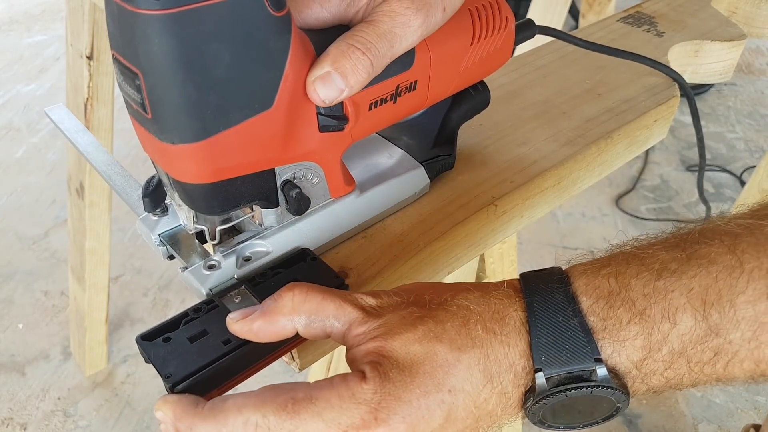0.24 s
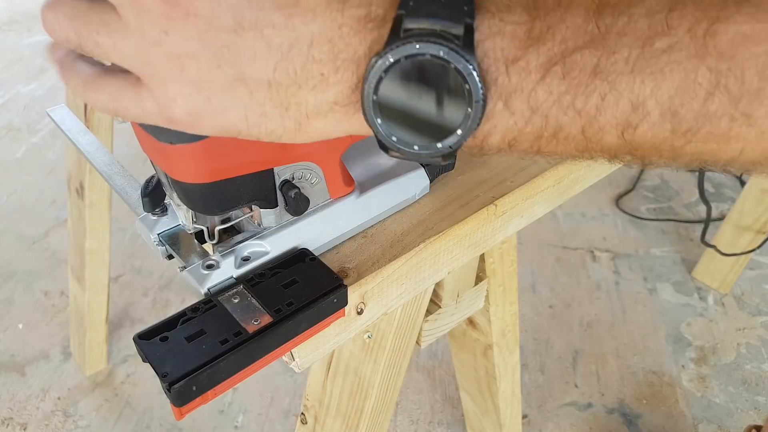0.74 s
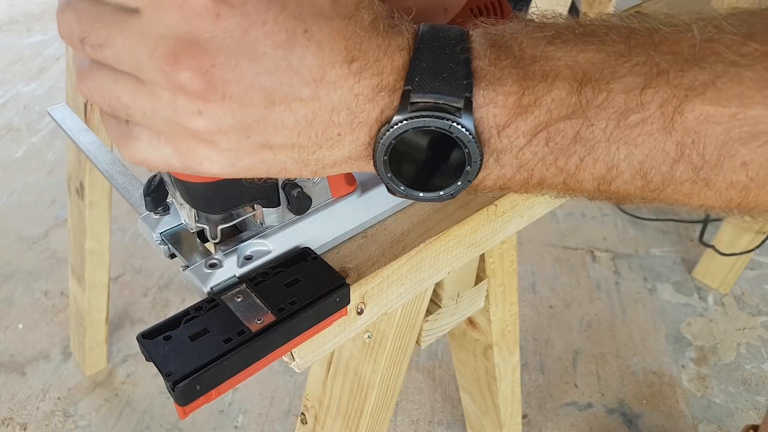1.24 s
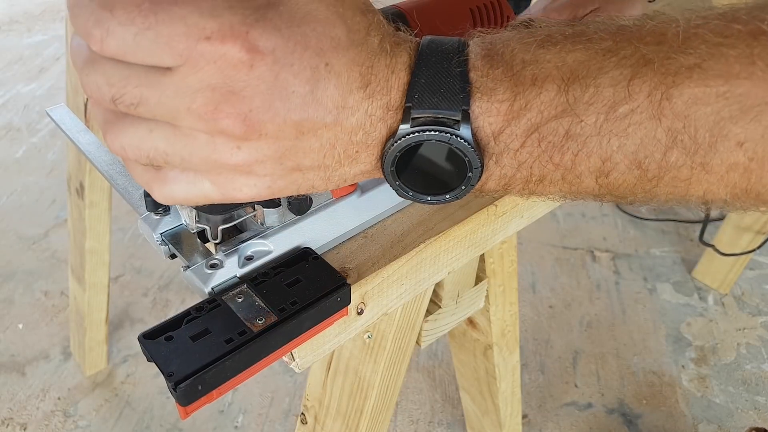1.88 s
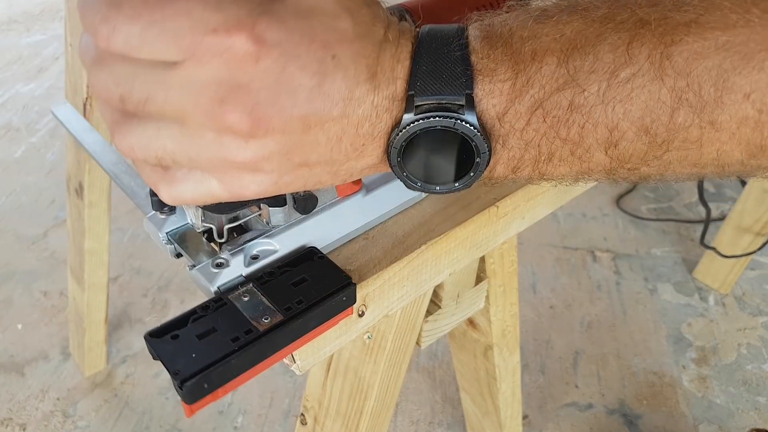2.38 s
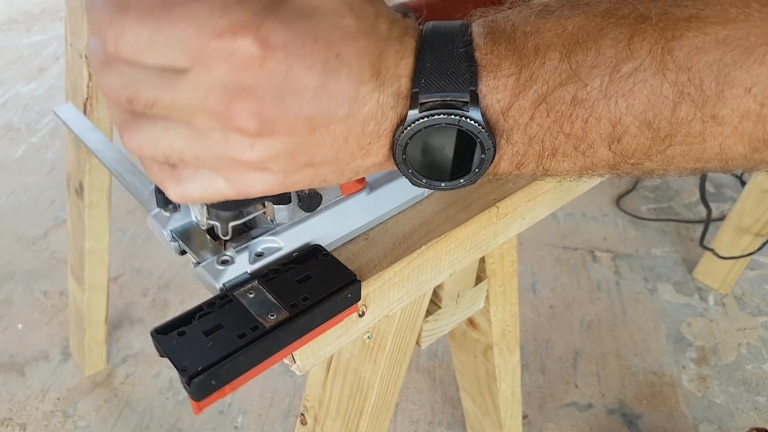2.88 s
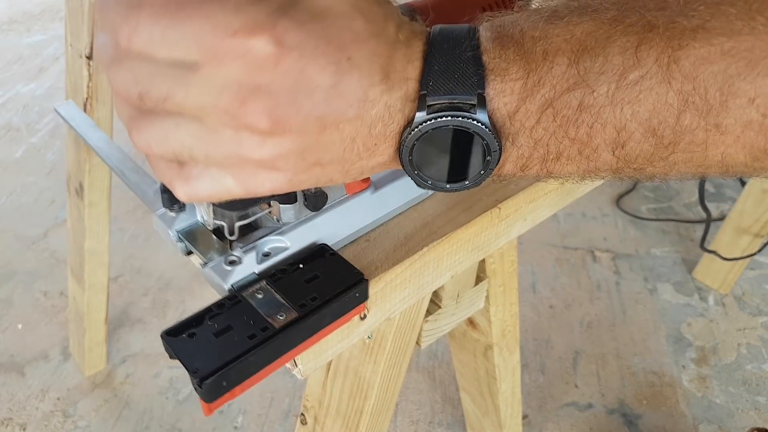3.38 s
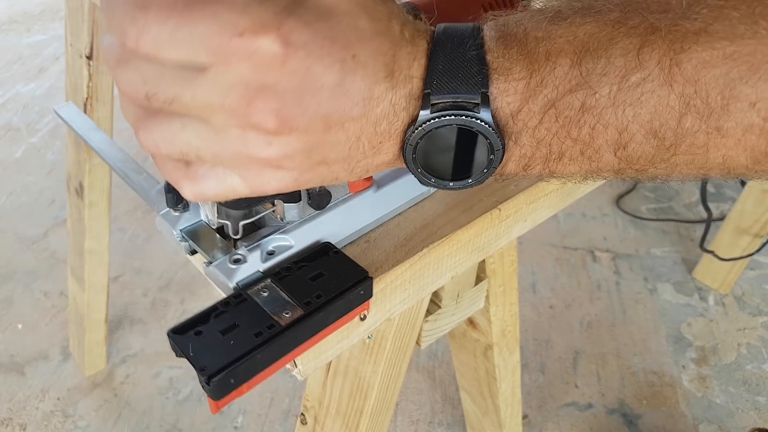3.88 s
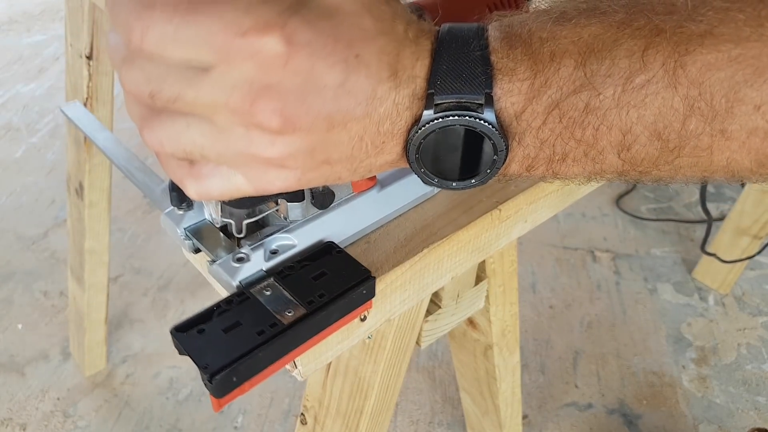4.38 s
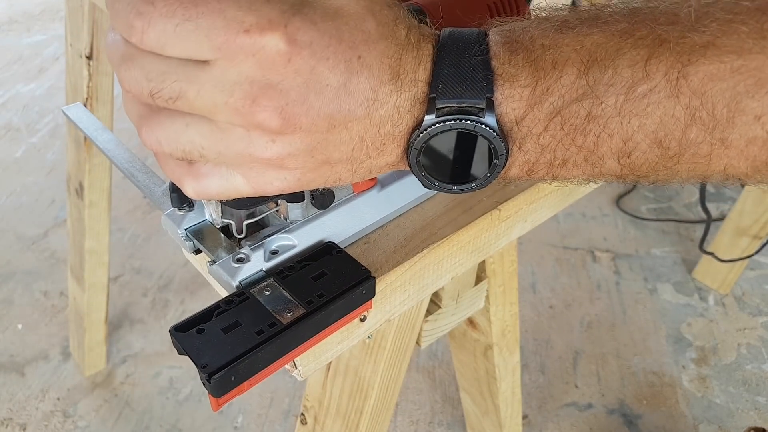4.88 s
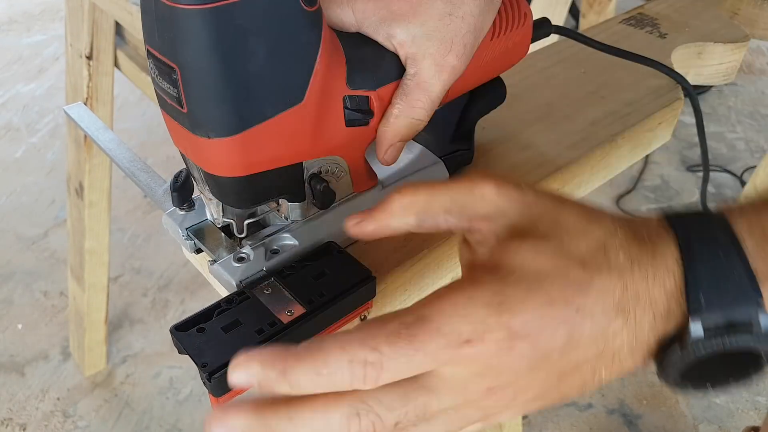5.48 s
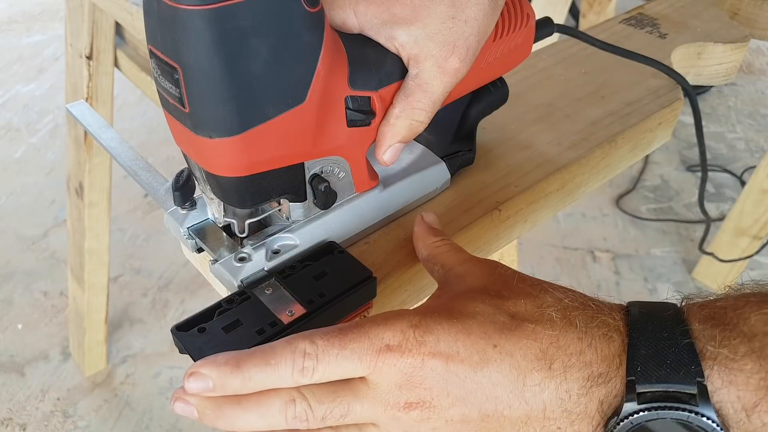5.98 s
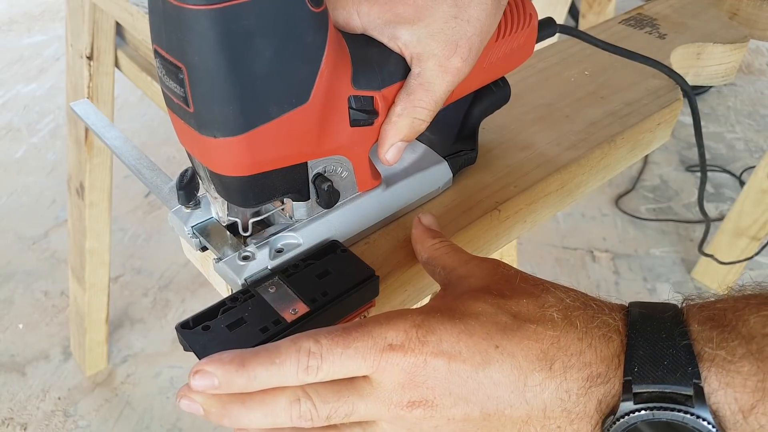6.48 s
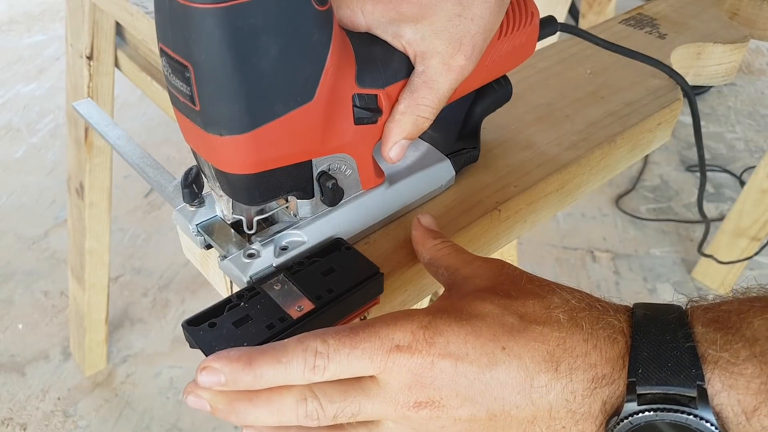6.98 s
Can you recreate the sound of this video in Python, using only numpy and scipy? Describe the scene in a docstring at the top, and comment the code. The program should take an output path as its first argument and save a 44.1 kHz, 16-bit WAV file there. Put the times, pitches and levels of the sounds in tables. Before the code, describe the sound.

Close to the microphone in a small shed, an electric jigsaw buzzes and rattles through wood without a break. The foot plate chatters against the board in spells, and the timber booms as the blade bites harder. Teeth and motor hiss in step with the strokes over a low hum from the sawhorse. The pitch dips a little, rises for a moment later on, and returns.

```python
"""A hard, rattling buzz: a corded jigsaw cuts a timber board on a sawhorse, in a shed, close to a camera.
Each stroke, about 48 a second, repeats nearly the same five knocks. They ring the saw's shell, foot plate
and the board; each part rings louder or softer as the hands press. Motor fan, gears and teeth hiss in
step with the stroke, with a faint whistle on top. Underneath, board and sawhorse hum and rumble."""
import sys
import numpy as np
from scipy import signal
from scipy.fft import rfft, irfft, next_fast_len
from scipy.io import wavfile
from scipy.ndimage import map_coordinates

SR = 44100
rng = np.random.default_rng(int(sys.argv[2]) if len(sys.argv) > 2 else 0)


def bounce(signal):
    """Save signal as a 16-bit WAV file at the path given by the first command-line argument."""
    frames = np.transpose(np.atleast_2d(signal))
    limited = np.clip(frames, -1, 1)
    pcm = np.round(limited * 32767).astype(np.int16)
    wavfile.write(sys.argv[1], SR, pcm)


N = 319284
TIME_S = np.arange(N) / SR
LEFT_RIGHT = np.array([[1], [-1]])


def amp(db):
    """dB to gain."""
    return 10 ** (np.asarray(db) / 20)


def unit(x):
    """x at rms 1."""
    return x / np.sqrt(np.mean(x ** 2) + 1e-20)


def unit_stereo(x):
    """x with its mono mix at rms 1."""
    return x / np.sqrt(np.mean(x.mean(0) ** 2))


def along(points, hz):
    """(Hz, value) points read on a log axis."""
    f, values = np.transpose(points)
    return np.interp(np.log(hz + 1), np.log(f + 1), values)


def curve(points):
    """(s, value) points read at every sample."""
    return np.interp(TIME_S, *np.transpose(points))


def wobble(rate_hz):
    """Smooth random curve, rate_hz knots a second."""
    return map_coordinates(rng.standard_normal(int(N * rate_hz / SR) + 4), [TIME_S * rate_hz])


def filtered(x, response):
    """x through a complex frequency response."""
    size = next_fast_len(N + 8192)
    return irfft(rfft(x, size) * response(np.fft.rfftfreq(size, 1 / SR)), size)[..., :N]


def sides(pan_db):
    """Left and right gains for a level difference."""
    return amp(LEFT_RIGHT * pan_db / 2)


def resonance(f, hz, width_hz):
    """Resonator applied twice for steep skirts."""
    return (1j * f * width_hz * 1.5 / (hz * hz - f * f + 1j * f * width_hz * 1.504)) ** 2


# Blade speed: (time [s], rate [strokes/s])
STROKE_RATE_HZ = [(0, 48.1), (.3, 47.3), (.64, 48.9), (1.13, 49.3), (1.38, 47.8), (1.65, 49.1),
                  (1.91, 49.3), (2.12, 48.4), (2.28, 46.2), (2.6, 46), (2.78, 47.1), (2.98, 46.3),
                  (3.47, 46.8), (3.55, 47.4), (3.71, 47.3), (3.87, 48.1), (4.05, 47.4), (4.17, 48.3),
                  (4.32, 48.1), (4.45, 47.2), (4.64, 48.4), (4.72, 48.3), (4.84, 50.6), (5, 51.7),
                  (5.18, 51.8), (5.91, 50.7), (6.37, 47.7), (6.53, 48.2), (6.73, 47.8), (7.24, 48.3)]


def blade_strokes():
    """Running count of the blade's strokes."""
    return np.cumsum(curve(STROKE_RATE_HZ)) / SR


# Knocks of one stroke: (place [strokes], strength [dB], wander [strokes])
KNOCKS = [(.7, -3, .003), (.08, -6, .003), (.24, -4, .003), (.45, -9, .012), (.86, -8, .012)]


def knock_times(strokes):
    """Knock times in samples, strokes x knocks; they wander, and slip more when the board shakes."""
    count = np.arange(int(strokes[-1]))
    start = np.interp(count, strokes, np.arange(N)).astype(int)
    place, _, drift = np.transpose(KNOCKS)
    wander = drift * np.transpose([wobble(2.5)[start] for _ in KNOCKS])
    times = np.interp(count[:, None] + place + wander, strokes, np.arange(N))
    jitter_s = 4e-5 + 1e-5 * amp(curve(SHAKING_DB) + 42)
    return np.clip(times + jitter_s[start, None] * SR * rng.standard_normal(times.shape), 0, N - 2)


def knocks(times, accent_db, drift_db, scatter_db, accented=0):
    """One impulse per knock; a stroke's energy shifts slowly among its knocks."""
    sample = times.astype(int)
    base_db = np.transpose(KNOCKS)[1] + accent_db * (np.arange(len(KNOCKS)) == accented)
    strength = amp(base_db + drift_db * np.transpose([wobble(3.51)[column] for column in sample.T]))
    strength /= np.linalg.norm(strength, axis=1, keepdims=True)
    strength *= amp(scatter_db * rng.standard_normal(times.shape))
    strength *= rng.choice([-1, 1], len(KNOCKS))  # some push, some pull
    fraction = times - sample
    early = np.bincount(sample.ravel(), (strength * (1 - fraction)).ravel(), N)
    return early + np.bincount(sample.ravel() + 1, (strength * fraction).ravel(), N)


def scrape_envelope(times, rise_s, depth, accent_db, scatter_db):
    """Scraping: a steady part plus a burst around each knock."""
    t = np.arange(-SR // 100, SR // 100) / SR / rise_s
    impulses = abs(knocks(times, accent_db, drift_db=3.5, scatter_db=scatter_db))
    bursts = signal.fftconvolve(impulses, np.exp(-t * t), "same")
    return unit(1 + depth * unit(bursts))


def swells(rows, squareness=3):
    """Sum of flat-topped level bumps in dB."""
    return sum(db * np.exp(-abs((TIME_S - s) / half_s) ** squareness) for s, half_s, db in rows)


# Feed pressure: (time [s], level [dB])
PUSH_DB = [(0.0, -29.5), (0.14, -23), (0.28, -18), (0.36, -26), (0.42, -22), (0.62, -34), (1.19, -26.5),
           (1.27, -20.5), (1.49, -21.5), (1.53, -24.5), (1.75, -28.5), (2.16, -17), (2.36, -24),
           (2.82, -21.5), (3.04, -26.5), (3.06, -22.5), (4.11, -23), (4.15, -24.5), (4.72, -21),
           (4.92, -31.5), (5.14, -34), (5.6, -30), (5.68, -21.5), (5.89, -26), (6.03, -17.5), (6.17, -20),
           (6.29, -18.5), (7.24, -20)]
# Control of the lowest ring: (time [s], level [dB])
LOW_RING_DB = [(0.0, -31), (0.62, -38), (1.15, -27.5), (1.59, -29), (1.75, -28), (3.25, -33.5), (3.85, -29),
               (3.97, -35.5), (4.58, -32.5), (5.81, -41.5), (5.95, -29.5), (6.03, -33), (6.21, -28.5),
               (7.08, -29.5), (7.24, -33)]
# Control of the two rings near 1.7 kHz: (time [s], level [dB])
RING_PAIR_DB = [(0.0, -26.5), (0.28, -17.5), (0.6, -32), (0.83, -38), (1.17, -27.5), (1.33, -18),
                (1.59, -28.5), (2.6, -23), (2.64, -28), (2.82, -21), (3.06, -22.5), (4.03, -22.5),
                (4.17, -26.5), (4.25, -20), (4.51, -28), (4.7, -23), (4.94, -32.5), (5.57, -28),
                (5.68, -22), (5.89, -27.5), (5.99, -21), (7.24, -21.5)]
# Blade bites harder, board booms: (centre [s], half length [s], swell [dB])
BITES = [(.28, 0.054, 4.5), (.44, .04, 3.5), (.57, 0.056, 7), (1.35, .15, 3), (1.65, .1, 2.5),
         (2.25, 0.053, 6.5), (2.48, 0.067, 6.5), (2.64, 0.085, 7), (2.97, 0.11, 9.5), (3.17, 0.089, 7),
         (3.45, 0.14, 9), (3.68, .06, 10), (4.03, .05, 11), (4.42, 0.07, 10), (4.68, 0.026, 6.5),
         (5.25, 0.36, 5.5), (5.62, 0.051, 4), (6.35, .1, 4.5)]
# Foot plate chatters on the wood: (centre [s], half length [s], swell [dB])
CHATTERS = [(.3, 0.31, 12), (1.38, 0.19, 11.5), (1.97, 0.17, 11), (2.46, 0.13, 13.5), (2.82, .1, 10),
            (3.12, 0.091, 8.5), (3.38, 0.077, 12), (3.63, .07, 8), (3.9, .06, 7), (4.3, 0.12, 7.5),
            (4.68, 0.13, 8.5), (5.72, 0.16, 9), (6.02, .1, 8), (6.73, 0.039, 5), (7.06, .05, 3)]


def handling():
    """Controls in dB: push, shaking, hiss, low ring and pair about their means, then bite and chatter."""
    levels_db = [curve(table) for table in (PUSH_DB, SHAKING_DB, HISS_DB, LOW_RING_DB, RING_PAIR_DB)]
    return np.array([db - db.mean() for db in levels_db] + [swells(BITES), swells(CHATTERS)])


# Rings: (frequency [Hz], width [Hz], left-right [dB], left lead [rad], scrape share [0-1], accent [dB])
RINGS = [(513, 86, 0.5, 0.16, 0.16, 5), (631, 104, 0.5, 0.12, .12, 9.5),
         (775.5, 113, -1, 0.087, 0.13, 11.5), (895, 92, 9, 0.29, 0.13, 8),
         (1331, 335, 4.5, 0.78, 0.58, 2.5), (1620, 70, 1.5, 0.21, 0.12, 4), (1776, 196, 3.5, .4, 0.2, 12.5),
         (2244, 330, 6.5, 0.96, 0.78, 3), (2583, 85, -9.5, 0.42, 0.17, 7.5)]
# Knock each ring feels most: (knock [index])
RING_ACCENTS = [1, 2, 2, 1, 0, 0, 0, 0, 0]
# Per ring: (base level [dB], then push, shaking, hiss, low ring, pair, bite, chatter [dB/dB])
RING_LEVELS = [(-33.5, -0.1, -.15, -0.26, 1.4, .01, 0.11, -.05),
               (-30.5, -0.18, 0.67, 0.34, 0.2, 0.022, 0.11, -0.024),
               (-28.5, 0.28, 0.34, -0.025, -0.11, .01, 0.99, 0.044),
               (-25, 1.27, 0.058, 0.022, -0.035, -0.011, -0.0049, 0.015),
               (-27, 0, 0.26, 0.75, 0.065, 0.083, 0.16, 0.016),
               (-32.5, -0.18, .6, 0.21, -0.062, 1.05, -0.05, 0.17),
               (-30, 0.34, -.35, -0.097, 0.073, 1.16, -0.16, -0.12),
               (-31, 0.4, -0.11, 0.72, -0.33, -0.0059, 0.033, -0.13),
               (-37.5, 0.11, 0.0011, 0.25, -0.087, 0.078, 0.019, 0.91)]
# Overtones of the last ring: (frequency [Hz], width [Hz], relative level [dB])
PLATE_OVERTONES = [(3100, 31, -10.5), (3435, 170, 5), (3695, 36, 8.5), (4396, 87, 2), (5420, 170, -4),
                   (6140, 68, 1.5), (6515, 105, 0), (7430, 59, 0)]


def ringing_parts(times, scrape, controls_db):
    """Knocks and scraping excite the resonances of shell, foot plate and board."""
    out = np.zeros((2, N))
    for ring, accented, (base_db, *slopes) in zip(RINGS, RING_ACCENTS, RING_LEVELS):
        hz, width_hz, pan_db, lead_rad, share, accent_db = ring
        level_db = base_db + np.dot(slopes, controls_db) + 0.65 * wobble(9)
        impulses = unit(knocks(times, accent_db, drift_db=2.5, scatter_db=1.5, accented=accented))
        drive = np.sqrt(1 - share) * impulses + np.sqrt(share) * scrape * rng.standard_normal(N)
        pan = sides(pan_db) * np.exp(0.5j * lead_rad * LEFT_RIGHT)
        out += amp(level_db) * unit_stereo(filtered(drive, lambda f: resonance(f, hz, width_hz) * pan))

    def plate(f):
        modes = sum(amp(db) * resonance(f, hz, width_hz) for hz, width_hz, db in PLATE_OVERTONES)
        return modes * sides(along(PAN_DB, f))

    return out + amp(level_db - 9.5) * unit(filtered(drive, plate))  # last ring's drive and level


# Board rattle and hum: (time [s], base level [dB])
BOARD_DB = [(0.0, -32), (0.93, -40.5), (1.21, -26.5), (1.43, -36), (4.58, -31.5), (4.64, -38.5),
            (5.02, -35), (5.26, -39.5), (5.32, -33.5), (6.11, -30.5), (6.21, -37.5), (7.1, -37),
            (7.12, -33), (7.24, -42)]
# Rattle spectrum: (frequency [Hz], relative density [dB])
RATTLE_SPECTRUM = [(250, -44), (450, -20), (700, 1), (1100, -9), (1500, -12), (2500, -51)]


def board_rattle(times):
    """Knocks rattle the board in a broad band near 700 Hz."""
    level_db = curve(BOARD_DB) - 2 + 1.3 * wobble(8)
    impulses = knocks(times, accent_db=5, drift_db=3, scatter_db=1.5)
    return amp(level_db) * unit(filtered(impulses, lambda hz: amp(along(RATTLE_SPECTRUM, hz))))


# Left-right likeness of the noise: (frequency [Hz], coherence [0-1])
COHERENCE = [(60, .95), (300, 0.72), (700, 0.35), (1500, 0.72), (3100, 0.33), (7000, 0.017)]
# Balance of noise and plate overtones: (frequency [Hz], left-right [dB])
PAN_DB = [(60, -2), (110, -1), (200, 2), (380, 4), (700, -4), (1290, -2.5), (2380, -0.5), (4400, 0),
          (8120, 9), (15000, 11)]


def stereo_noise(spectrum, envelope, lead_s=7.5e-5):
    """Enveloped, coloured noise at unit level; the saw is nearer the left microphone."""
    def mid_side(hz):
        angle = np.arccos(along(COHERENCE, hz)) / 2
        return amp(along(spectrum, hz)) * [np.cos(angle), np.sin(angle)]

    def pan(hz):
        return sides(along(PAN_DB, hz)) * np.exp(2j * np.pi * hz * lead_s * LEFT_RIGHT)

    mid, side = filtered(envelope * rng.standard_normal((2, N)), mid_side)
    return unit_stereo(filtered(np.array([mid + side, mid - side]), pan))


# Fan and gear noise: (frequency [Hz], relative density [dB])
GEAR_SPECTRUM = [(180, -72), (300, -15.5), (532, -13), (777, -34), (958, -6.5), (1340, -6.5), (1460, -26),
                 (1750, -11), (2280, -6), (2620, -4), (8500, -28), (11000, -115), (18700, -120)]


def fan_and_gears(scrape, hiss_change_db):
    """Fan and gears rush in step with the stroke and follow the hiss level."""
    return amp(-28 + 0.87 * hiss_change_db) * stereo_noise(GEAR_SPECTRUM, scrape)


# Tooth hiss: (time [s], level [dB])
HISS_DB = [(0.0, -35.5), (0.06, -37.5), (0.2, -34), (0.68, -38.5), (1.23, -34.5), (1.31, -32), (1.61, -35),
           (1.98, -34.5), (2.08, -32), (2.32, -38), (2.46, -34.5), (2.64, -38.5), (2.84, -35.5),
           (2.92, -37), (3.43, -37), (3.55, -40), (3.63, -34.5), (3.79, -39.5), (3.99, -35.5), (4.09, -40),
           (4.4, -36), (4.47, -39), (5.3, -37.5), (5.6, -30.5), (6.33, -34.5), (7.24, -36.5)]
# Hiss spectrum: (frequency [Hz], relative density [dB])
HISS_SPECTRUM = [(2940, -10.5), (5000, -1.5), (7820, -8.5), (9240, -13), (13800, -6), (15600, -10)]


def teeth_hiss(times):
    """Teeth scrape the wood, loudest around each knock."""
    envelope = scrape_envelope(times, rise_s=0.0019, depth=0.69, accent_db=2.5, scatter_db=3)
    return amp(curve(HISS_DB)) * stereo_noise(HISS_SPECTRUM, envelope)


# Whistle: (time [s], level before panning [dB])
WHISTLE_DB = [(0, -71), (.5, -52), (2, -56), (2.3, -68), (7.24, -66)]


def whistle(hz=8005):
    """A faint, thin tone flickers on the left."""
    level_db = curve(WHISTLE_DB) + 4.5 * wobble(25)
    phase_rad = 2 * np.pi * hz * TIME_S + 1.4 * wobble(25)
    return amp(level_db) * np.sin(phase_rad) * sides(18)


def stroke_harmonics(table, strokes, waver_db):
    """Wavering tones on multiples of the stroke rate, at rms 1."""
    return unit(sum(amp(db + waver_db * wobble(7.3)) * np.sin(2 * np.pi * (k * strokes + rng.random()))
                    for k, db in table))


# Sawhorse shaking: (time [s], level [dB])
SHAKING_DB = [(0.0, -51), (0.46, -53), (0.52, -56.5), (1.05, -56), (1.25, -45), (1.37, -51.5),
              (1.93, -51.5), (2.22, -43), (4.34, -42.5), (4.54, -44), (4.58, -42), (5.02, -61),
              (5.71, -53.5), (6.15, -57), (7.22, -55), (7.24, -46)]
# Sawhorse tones: (harmonic [x stroke rate], relative level [dB])
SAWHORSE_HARMONICS = [(1, -14.5), (2, -1.5), (3, -4), (4, -6)]
# Timber rumble: (frequency [Hz], relative density [dB])
RUMBLE_SPECTRUM = [(13, -54), (22, -24), (48, -30), (92, -18), (146, -2.5), (300, 8), (390, -18),
                   (660, -120)]
# Board hum: (harmonic [x stroke rate], relative level [dB])
HUM_HARMONICS = [(4, -8.5), (5, -3), (6, -3), (7, 0.5), (8, 2), (9, 0), (10, -5.5)]


def shaking_timber(strokes, shake_change_db, bite_db):
    """Sawhorse and board shake with the stroke; harder shaking trades hum for a lumpy rumble."""
    sawhorse = amp(curve(SHAKING_DB)) * stroke_harmonics(SAWHORSE_HARMONICS, strokes, waver_db=0.8)
    lumps = amp(3 * wobble(30))
    rumble = amp(-51 + 0.9 * shake_change_db + 0.4 * bite_db) * stereo_noise(RUMBLE_SPECTRUM, lumps)
    hum_db = curve(BOARD_DB) - 3.5 - 0.27 * shake_change_db
    return sawhorse + rumble + amp(hum_db) * stroke_harmonics(HUM_HARMONICS, strokes, waver_db=3)


# Shed decay: (frequency [Hz], T60 [s])
SHED_T60_S = [(100, .02), (500, 0.19), (2000, 0.31), (10000, 0.075)]


def shed_reverb(x, segments=16, delay_samples=200):
    """Each frequency dies at its own rate; the tail changes as arms and hands move."""
    out = np.zeros((2, N + SR))
    for k in range(segments + 1):
        hz, t, noise = signal.stft(rng.standard_normal((2, SR // 4)), SR, nperseg=256)
        decay = amp(-60 * t / along(SHED_T60_S, hz)[:, None])
        tail = signal.istft(noise * decay, SR, nperseg=256)[1]
        start, end = max(0, (k - 1) * N // segments), min(N, (k + 1) * N // segments)
        fade = np.cos(np.pi / 2 * (np.arange(start, end) * segments / N - k))
        wet = signal.fftconvolve((x[start:end] * fade)[None], tail / np.linalg.norm(tail[0]), axes=1)
        arrival = start + delay_samples
        out[:, arrival:arrival + wet.shape[1]] += wet
    return out[:, :N]


# Balance as the hands move: (time [s], left-right [dB])
LEAN_DB = [(0, .5), (4.4, -0.4), (4.8, 1), (5.7, 0.5), (6.2, -0.6), (7.24, 0.5)]


def scene():
    """Saw, board and sawhorse in a shed."""
    controls_db = handling()
    _, shake_change_db, hiss_change_db, _, _, bite_db, _ = controls_db
    strokes = blade_strokes()
    times = knock_times(strokes)
    scrape = scrape_envelope(times, rise_s=0.002, depth=0.47, accent_db=6, scatter_db=4.5)
    body = ringing_parts(times, scrape, controls_db) + board_rattle(times)
    saw = amp(1) * body + fan_and_gears(scrape, hiss_change_db) + teeth_hiss(times) + whistle()
    timber = shaking_timber(strokes, shake_change_db, bite_db)
    room = amp(-5.5) * shed_reverb(body.mean(0))
    return sides(curve(LEAN_DB)) * (saw + room) + timber


def record(dry):
    """The camera rounds off peaks, rolls off deep bass and cuts everything above its band limit."""
    ceiling, low_cut_hz, top_hz = 1.05, 45, 16050
    soft = dry / (1 + abs(dry / ceiling) ** 8) ** (1 / 8)
    return filtered(soft, lambda hz: (hz < top_hz) / np.sqrt(1 + (low_cut_hz / (hz + 1)) ** 4))


dry = scene()
out = record(dry)
bounce(out)
```